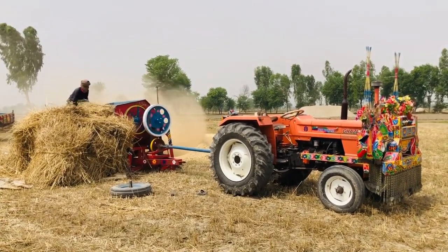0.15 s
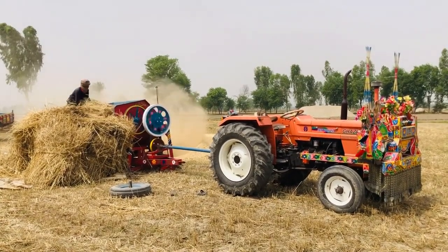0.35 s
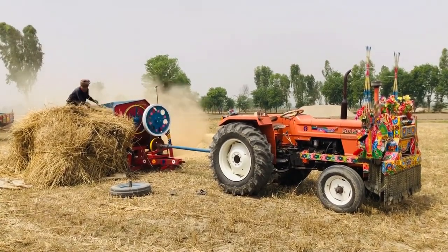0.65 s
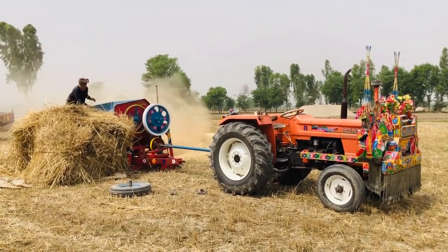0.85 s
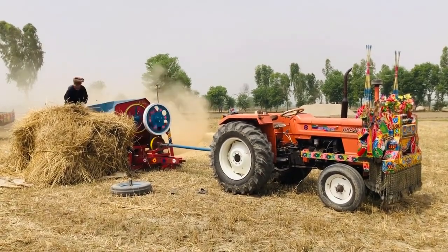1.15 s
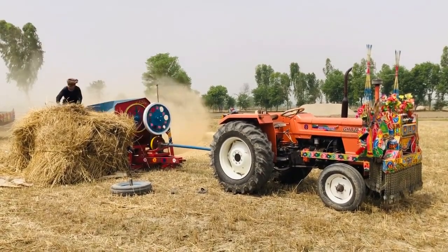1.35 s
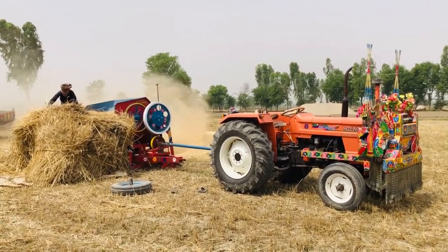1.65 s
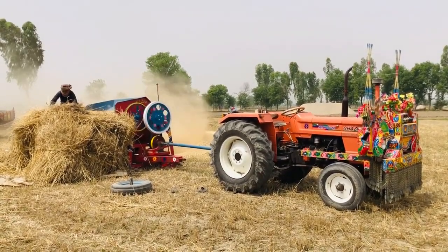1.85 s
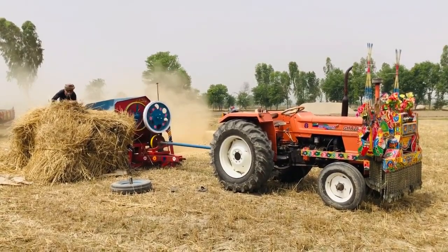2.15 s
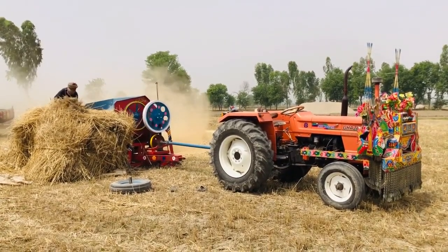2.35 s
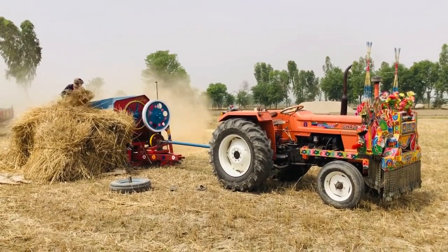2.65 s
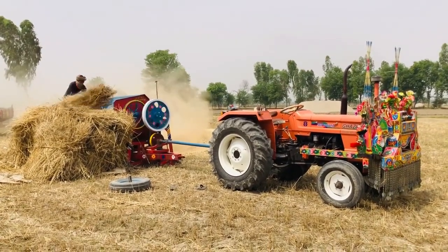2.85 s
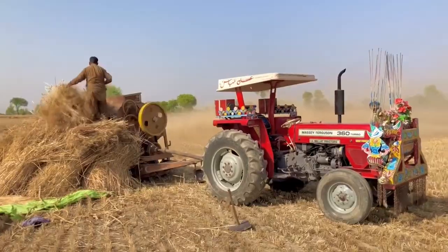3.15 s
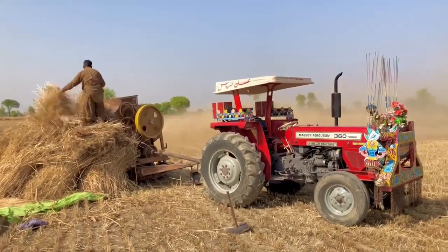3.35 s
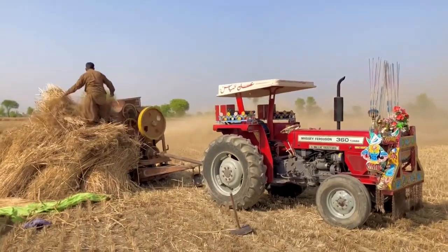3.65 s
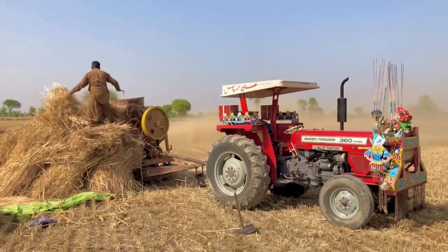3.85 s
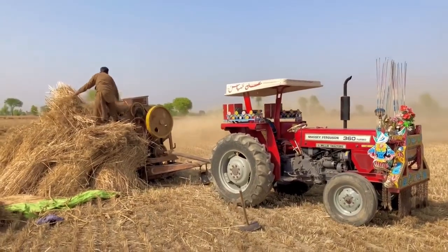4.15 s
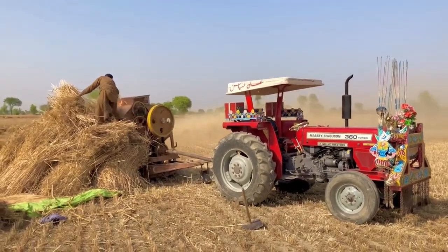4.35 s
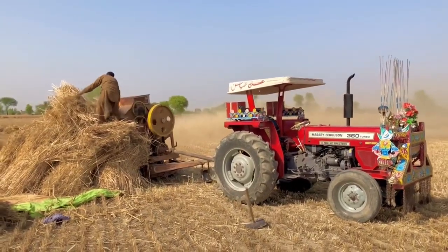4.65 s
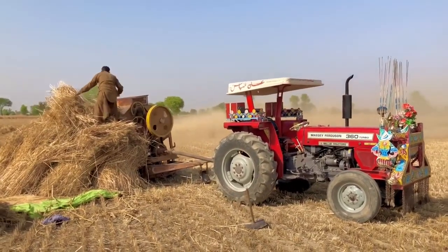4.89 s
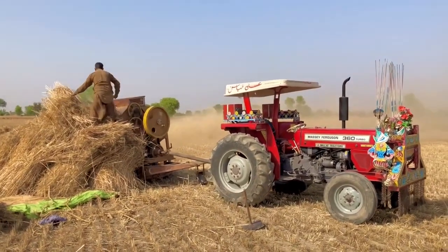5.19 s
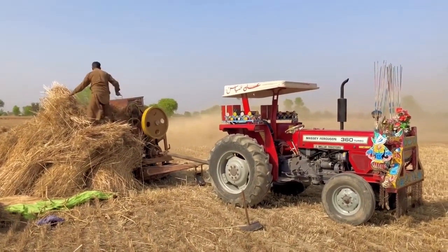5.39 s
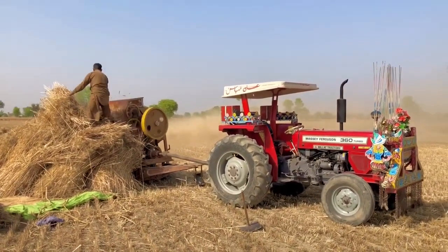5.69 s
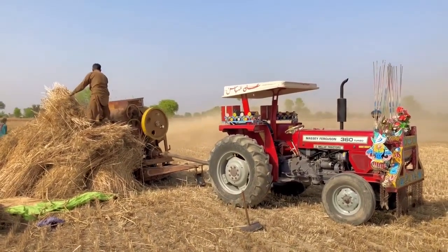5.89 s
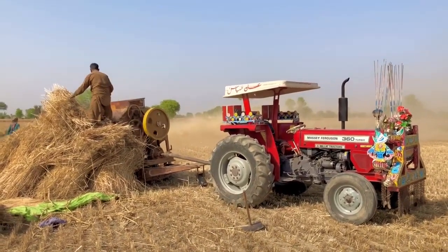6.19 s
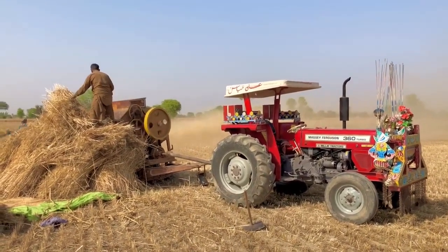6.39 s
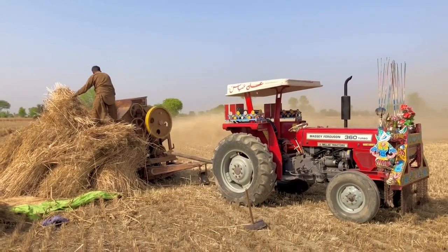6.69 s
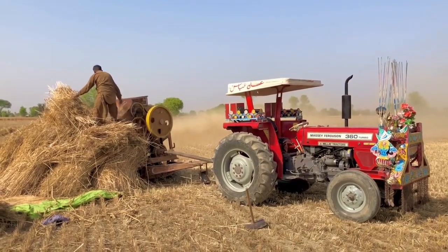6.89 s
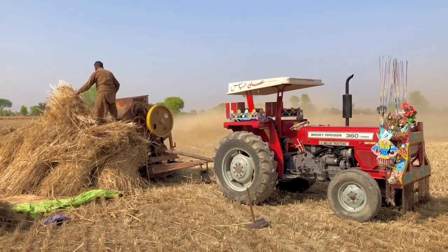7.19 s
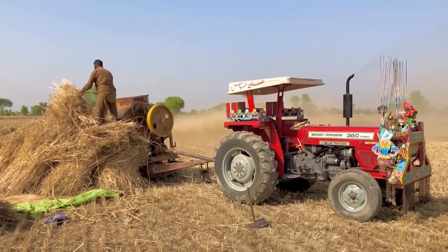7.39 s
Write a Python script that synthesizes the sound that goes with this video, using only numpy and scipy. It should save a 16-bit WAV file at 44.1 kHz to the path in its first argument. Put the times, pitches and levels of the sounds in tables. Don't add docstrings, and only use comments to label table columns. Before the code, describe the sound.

In an open field, a three-cylinder diesel tractor powers a threshing machine very loudly: low throbbing exhaust, gear whine, beating drum and a thick roar of straw and fan. The engine sags slightly under load and recovers. After about three seconds a sharp click switches to a second, far quieter tractor and thresher, steady and hissy, with faint high belt squeaks. Plain phone microphone, dry outdoors, no treble at the very top.

```python
import sys
import numpy as np
from scipy import signal
from scipy.fft import rfft, irfft, next_fast_len
from scipy.io import wavfile
from scipy.ndimage import uniform_filter1d, map_coordinates

SR = 44100
rng = np.random.default_rng(int(sys.argv[2]) if len(sys.argv) > 2 else 0)


def elevation(decibels):
    levels = np.asarray(decibels, float)
    return 10 ** (levels / 20)


def generate_wav(signal):
    frames = np.transpose(np.atleast_2d(signal))
    scaled = np.clip(frames, -1, 1) * 32767
    pcm = np.round(scaled).astype(np.int16)
    wavfile.write(sys.argv[1], SR, pcm)


N = 332073
CUT_S = 3.15524
CUT_CREST = .14
FADE_IN_S = .0015
LABOUR_DB, LABOUR_DB_PER_HZ = -45, 6.3
CREEP_DB, SLIP_FALL_HZ = -85, 90
EXHAUST_LINES = 8

# t/s, firing rate f/Hz
LOUD_SPEED = [
    (0, 46.569),
    (.3, 46.987),
    (.9, 47.306),
    (1.4, 46.471),
    (1.72, 45.194),
    (2.4, 45.446),
    (3.155, 46.364),
]
QUIET_SPEED = [
    (3.156, 45.085),
    (4.5, 45.98),
    (5.5, 46.365),
    (6.2, 46.087),
    (7.1, 44.491),
    (7.53, 44.36),
]
LOUD_DRIVE = 47.3, 1.04277, .00247
QUIET_DRIVE = 46.4, 1.23825, .00144
LOUD_LOAD = .8, .22, .09
QUIET_LOAD = .4, .07, .05
QUIET_RISE_DB = 1.4, -1.5, .9
LOUD_ORDERS = [1, 2, 7 / 3, 8 / 3, 3, 3.793, 5, 17 / 3, 20 / 3, 8, 26 / 3, 29 / 3, 14, 15, 17, 52 / 3, 21,
               64 / 3, 68 / 3, 23, 71 / 3, 77 / 3, 26, 27, 32, 98 / 3, 104 / 3, 106 / 3, 36, 154 / 3, 155 /
               3, 52, 157 / 3]
LOUD_ORDER_DB = [-44, -27, -31.5, -40, -40, -34, -36.5, -42, -40, -42, -42, -45, -43, -40, -46, -32, -44,
                 -44, -43, -41, -45, -44, -34, -46, -60, -56, -55, -57, -61, -71, -69, -76, -70]
QUIET_ORDERS = [1, 2, 8 / 3, 2.801, 3, 11 / 3, 4, 5, 7.871, 8, 26 / 3, 11, 50 / 3, 18, 56 / 3, 64 / 3, 31,
                32, 100 / 3, 103 / 3, 42, 44, 50, 163 / 3, 166 / 3, 56]
QUIET_ORDER_DB = [-55, -45, -57, -55, -50, -59, -42.8, -59, -59, -63, -61, -66, -54, -63, -65, -59, -68,
                  -67, -63, -66, -67, -71, -74, -74, -73, -75]
LOUD_DRUM_DB = [-39, -30, -34.5]
QUIET_DRUM_DB = [-43, -44, -55, -59, -49, -72, -72, -64, -72, -66]
# f/Hz, level/dB [per Hz]
LOUD_ROAR = [(28, -27), (48, -2), (70, 2), (200, 0), (300, -1.5), (480, -9), (620, -4.5), (800, -1.5),
             (1050, -5), (1150, -10), (1330, -13), (1450, -18.5), (1680, -21.5), (1900, -28), (3500, -65),
             (9000, -90)]
LOUD_CLATTER = [(900, -30.5), (1800, -10.5), (2200, -6.5), (2400, 0), (2700, -1.5), (3300, -6.5),
                (4300, -10), (5000, -17), (6500, -15), (8500, -22.5), (10400, -27), (11200, -34.5),
                (15700, -44)]
QUIET_ROAR = [(28, -22), (45, -5), (70, 2), (130, 0), (340, -4), (430, -11), (740, -2.5), (950, -12),
              (1100, -14), (1480, -11.5), (1800, -16), (2050, -14), (2350, -24), (3200, -50)]
QUIET_CLATTER = [(1800, -2.5), (2350, 7), (2600, 12), (2850, 8.5), (3400, 3.5), (4200, 6), (5400, -5.5),
                 (7000, -0.5), (8500, -1.5), (10000, -6), (12000, -7.5), (15700, -10.5)]
# f/Hz, level/dB [per Hz]
MIC_HISS = [(9000, -27), (11000, -16), (13500, -10), (15000, 0), (15700, 2.5)]
PULLEY_HZ = [
    [10880, 11500, 12150, 13700],
    [7700, 8450, 9250],
]
PULLEY_DB = [
    [-5, -2.5, -9, -12],
    [-5, -2, -6],
]
# t/s, length/s, level/dB rms
SMALL_SLIPS = [
    (3.3, .15, -82),
    (3.75, .45, -77),
    (4.17, .25, -77),
    (4.72, .15, -81),
    (5.08, .25, -82),
    (5.4, .4, -85),
    (6.5, .9, -85),
]
LARGE_SLIPS = [
    (3.5, .5, -83),
    (4.35, .8, -78),
    (5, .6, -82),
    (5.8, .9, -82),
    (6.9, 1.2, -80),
]


def unit(x):
    return x / np.sqrt(np.mean(x ** 2) + 1e-20)


def curves(rows):
    t_s, *columns = np.transpose(rows)
    return [np.interp(np.arange(N) / SR, t_s, column) for column in columns]


def wobble(rate_hz, size=N):
    coarse = np.arange(0, size + 32, 32)
    knots = rng.standard_normal(int(size * rate_hz / SR) + 4)
    smooth = map_coordinates(knots, [coarse * rate_hz / SR])
    return np.interp(np.arange(size), coarse, smooth)


def coloured(x, spectrum):
    m = next_fast_len(N + 8192)
    hz, db = np.transpose(spectrum)
    bins_hz = np.fft.rfftfreq(m, 1 / SR) + 1
    gain = elevation(np.interp(np.log(bins_hz), np.log(hz), db, left=-90))
    return unit(irfft(rfft(x, m) * gain, m)[:N])


def patchy_noise(patch_db):
    z = signal.stft(rng.standard_normal(N), nperseg=512)[2]
    field = uniform_filter1d(rng.standard_normal(z.shape), 6, 0)
    field = uniform_filter1d(field, 12, 1)
    return unit(signal.istft(z * elevation(patch_db * unit(field)), nperseg=512)[1][:N])


def shaft_turns(hz, start_s):
    total = np.cumsum(hz) / SR
    return total - total[round(start_s * SR)]


def knocks(firing, at, cylinders, sharp):
    count = np.floor(firing - at + .5).astype(int)
    chance = elevation(2.0 * rng.standard_normal(400)[count % 400])
    size = np.asarray(cylinders)[count % 3] * chance
    bump = size * np.exp(sharp * (np.cos(2 * np.pi * (firing - at)) - 1))
    return bump / np.mean(bump)


def cycle_pattern(firing):
    phases = np.exp(2j * np.pi * rng.uniform(size=301))
    table = irfft(phases * (np.arange(301) > 15))
    return unit(map_coordinates(table, [firing / 3 % 1 * len(table)], mode="grid-wrap"))


def roar_and_clatter(start_s, speed, drive, load, roar, clatter, roar_db, clatter_db, knock_at, cylinders):
    firing_hz, = curves(speed)
    free_hz, ratio, slip_per_hz = drive
    rise_db_per_hz, depth, harden_per_hz = load
    sag_hz = free_hz - firing_hz
    firing = shaft_turns(firing_hz, start_s)
    drum = shaft_turns(ratio * firing_hz * (1 - slip_per_hz * sag_hz), start_s)

    depth = np.clip(depth + harden_per_hz * sag_hz, 0, 1)
    beat = knocks(firing, knock_at, cylinders, sharp=2.5)
    source = patchy_noise(1.2) + .3 * cycle_pattern(firing)
    low = coloured(source * (1 + .2 * depth * (beat - 1)), roar)
    shaken = patchy_noise(0.63) * np.sqrt(1 - depth + depth * beat)
    high = coloured(shaken, clatter)

    low_gain = elevation(roar_db + 0.55 * wobble(9))
    high_gain = elevation(clatter_db + rise_db_per_hz * sag_hz + 0.23 * wobble(12))
    return low_gain * low + high_gain * high, firing, drum, sag_hz


def shaft_lines(angle, orders, levels_db, lead_rad, waver_db, span):
    out, angle = np.zeros(N), angle[span]
    size = len(angle)
    for k, db in zip(orders, levels_db):
        loose = min(k / 8, 1)
        scatter = rng.uniform(0, 2 * np.pi) * (k > 3.5) + .3 * loose * wobble(25, size)
        waver = .5 * wobble(5, size) + .7 * wobble(30, size)
        level = elevation(db + waver_db * loose * waver)
        out[span] -= np.sqrt(2) * level * np.cos(2 * np.pi * k * angle + k * lead_rad + scatter)
    return out


def loud_machine():
    noise, firing, drum, sag_hz = roar_and_clatter(
        0, LOUD_SPEED, LOUD_DRIVE, LOUD_LOAD, LOUD_ROAR, LOUD_CLATTER,
        roar_db=-22.0, clatter_db=-55.0, knock_at=0.48, cylinders=[1, 1.25, .8])
    span = slice(0, round(CUT_S * SR) + 9)
    engine = shaft_lines(firing, LOUD_ORDERS, LOUD_ORDER_DB, -1.55, 3, span)
    labour = elevation(LABOUR_DB + LABOUR_DB_PER_HZ * sag_hz)
    thump = labour * shaft_lines(firing, [1, 17, 52], [0, -1, -33], -1.55, 4, span)
    beaters = shaft_lines(drum, [1, 2, 3], LOUD_DRUM_DB, -2.25, 4, span)
    hiss = elevation(-78) * coloured(rng.standard_normal(N), MIC_HISS)
    return noise + engine + thump + beaters + hiss


def quiet_machine():
    noise, firing, drum, sag_hz = roar_and_clatter(
        CUT_S, QUIET_SPEED, QUIET_DRIVE, QUIET_LOAD, QUIET_ROAR, QUIET_CLATTER,
        roar_db=-41.0, clatter_db=-57.5, knock_at=.05, cylinders=[1.2, 1.1, .7])
    span = slice(round(CUT_S * SR) - 9, N)
    pipe_db, gear_db, usual_hz = QUIET_RISE_DB
    extra_hz = sag_hz - usual_hz
    low, high = slice(0, EXHAUST_LINES), slice(EXHAUST_LINES, None)
    pipe = shaft_lines(firing, QUIET_ORDERS[low], QUIET_ORDER_DB[low], 1.5, 1.5, span)
    gears = shaft_lines(firing, QUIET_ORDERS[high], QUIET_ORDER_DB[high], 1.5, 2.5, span)
    beaters = shaft_lines(drum, np.arange(1, 11), QUIET_DRUM_DB, .6, 2.5, span)
    return noise + elevation(pipe_db * extra_hz) * pipe + elevation(gear_db * extra_hz) * gears + beaters


def belt_squeak():
    first = round(CUT_S * SR)
    out, t, size = np.zeros(N), np.arange(first, N) / SR, N - first
    for slips, rings_hz, rings_db in zip((SMALL_SLIPS, LARGE_SLIPS), PULLEY_HZ, PULLEY_DB):
        slip_s, length_s, slip_db = np.transpose(slips)[:, :, None]
        u = 2 * (t - slip_s) / length_s
        swell = np.exp(-np.abs(u) * u * u)
        level = elevation(CREEP_DB) + np.sum(elevation(slip_db) * swell, axis=0)
        fall = np.sum(u * swell, axis=0)
        for hz, ring_db in zip(rings_hz, rings_db):
            jitter_hz = 50 * wobble(4, size) + 40 * wobble(10, size) + 95 * wobble(200, size)
            pitch_hz = hz - SLIP_FALL_HZ * fall + jitter_hz
            flutter_db = 6 + 1.5 * wobble(4, size) + 3 * wobble(35, size)
            ring = np.sin(2 * np.pi * np.cumsum(pitch_hz) / SR)
            out[first:] += level * elevation(ring_db + flutter_db) * ring
    return out


def scene():
    cut, t = round(CUT_S * SR), np.arange(N) / SR
    loud = loud_machine() * np.clip(t / FADE_IN_S, 0, 1)
    crest = np.exp(-((t - CUT_S) / .0006) ** 2)
    loud = loud + (CUT_CREST - loud[cut]) * crest
    switch = np.clip((t - CUT_S) / 1.5e-5 + .5, 0, 1)
    quiet = quiet_machine() + belt_squeak()
    return ((1 - switch) * loud + switch * quiet)[None]


def roll_off(x):
    return signal.sosfilt(signal.butter(12, 15740, fs=SR, output="sos"), x)


def record(dry):
    return roll_off(dry)


dry = scene()
out = record(dry)
generate_wav(out)
```